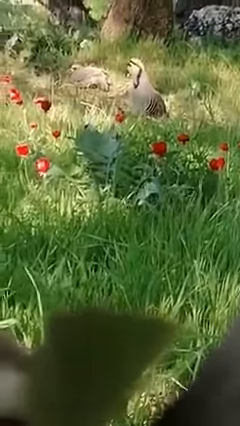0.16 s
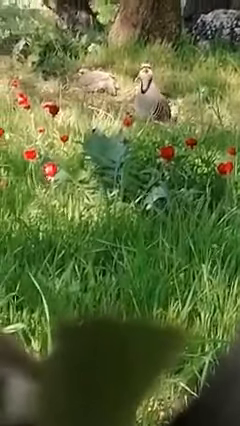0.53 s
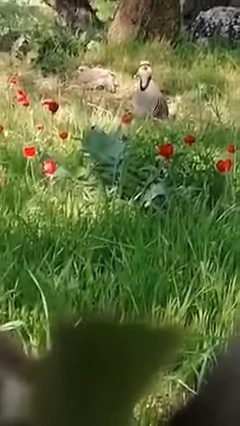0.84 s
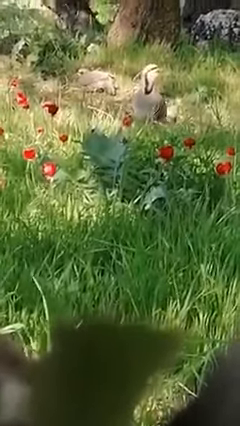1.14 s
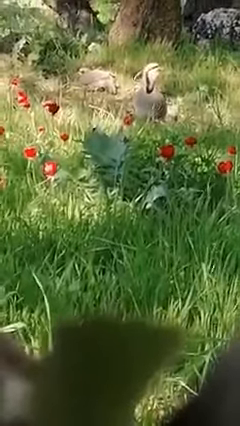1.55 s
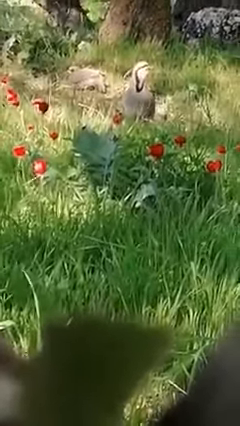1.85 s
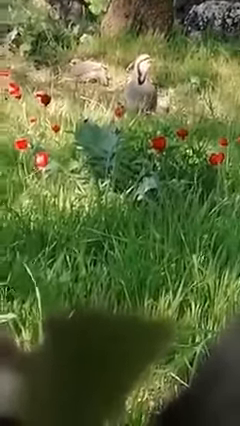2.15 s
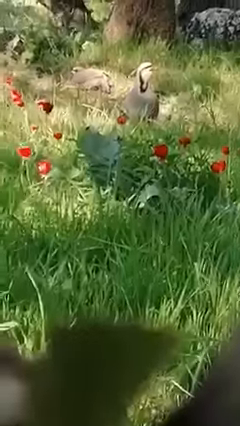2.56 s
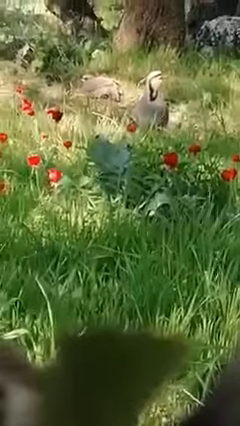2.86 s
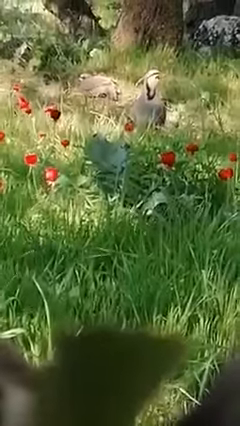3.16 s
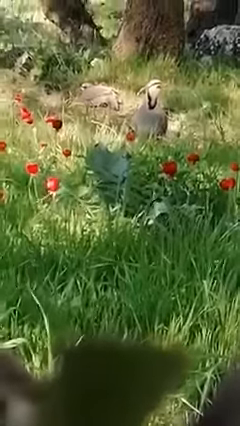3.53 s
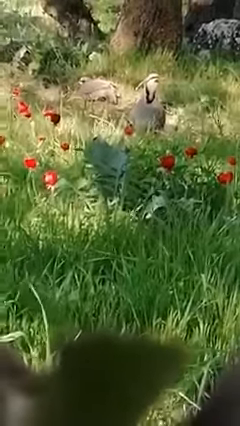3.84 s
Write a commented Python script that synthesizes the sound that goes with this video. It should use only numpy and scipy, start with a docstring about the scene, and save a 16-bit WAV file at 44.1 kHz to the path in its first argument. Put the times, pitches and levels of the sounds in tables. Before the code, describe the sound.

Harsh rhythmic partridge clucking, each bark followed by a round cluck, a softer cluck and a slightly drawn note; short outdoor echo, thin high insect buzzing, low air noise and one small nearby swish midway.

```python
"""Partridge calling in a grassy garden

A partridge calls in four-note phrases: a harsh open-beaked bark, a round cluck, a soft cluck and a drawn note.
Each note mixes a pitched tone with single snaps of the syrinx that ring the throat; grass, trunks and rocks
scatter it. Far insects trill as pulsed bands of noise over quiet air made of coloured noise.
Something rustles once beside the right microphone, as grainy noise."""
import sys
import numpy as np
from scipy import signal
from scipy.fft import rfft, irfft, next_fast_len
from scipy.io import wavfile
from scipy.ndimage import map_coordinates

SR = 44100
rng = np.random.default_rng(int(sys.argv[2]) if len(sys.argv) > 2 else 0)


def output_pcm(signal):
    """Save a mono or channel-first signal as 16-bit PCM at the path in sys.argv[1].

    Samples are clipped to [-1, 1] before scaling.
    """
    pcm = np.clip(np.atleast_2d(signal).T, -1, 1) * 32767
    wavfile.write(sys.argv[1], SR, np.round(pcm).astype(np.int16))


N = 176400  # samples


def amp(db):
    """Decibels to gain."""
    return 10 ** (np.asarray(db) / 20)


def unit(x):
    """Scale to rms 1."""
    return x / np.sqrt(np.mean(x ** 2) + 1e-20)


def along(points, hz):
    """Read a curve of (Hz, value) points on a log frequency axis."""
    f, v = np.transpose(points)
    return np.interp(np.log(hz + 1), np.log(f + 1), v)


def wobble(rate, size=N):
    """A smooth random curve through a given rate of knots a second."""
    knots = rng.standard_normal(size // 20 + 8)
    return map_coordinates(knots, [2 + np.arange(size) * rate / SR], mode='mirror')


def filtered(x, response):
    """Multiply the spectrum of x by a response of frequency."""
    m = next_fast_len(N + SR // 2)
    hz = np.fft.rfftfreq(m, 1 / SR)
    return irfft(rfft(x, m) * response(hz), m)[..., :N]


def noise(spectrum, alike=((1000, 1),)):
    """Stereo noise of rms 1; the balance of mid and side sets how alike left and right are."""
    def mid_side_gains(hz):
        turn = np.arccos(np.clip(along(alike, hz), -1, 1)) / 2
        return amp(along(spectrum, hz)) * [np.cos(turn), np.sin(turn)]

    mid, side = filtered(rng.standard_normal((2, N)), mid_side_gains)
    return unit(np.array([mid + side, mid - side]))


def ramp(x):
    """A smooth step from 0 to 1."""
    return np.sin(np.pi / 2 * np.clip(x, 0, 1)) ** 2


def swell(t, length, attack, release):
    """Attack, hold and release."""
    return ramp(t / attack) * ramp((length - t) / release)


# The four notes of the phrase. Each row: start in seconds, length in seconds, mid-note pitch in Hz,
# level in dB before the throat colours it, extra rasp in dB, share of the note at which the beak starts to open.
BARK_NOTES = [(-.028, 0.061, 394.7, -42, -1, -0.36), (.183, 0.062, 403.6, -43.5, -1, -0.29),
              (.749, 0.06, 413.6, -43, 2.5, -0.44), (1.251, .06, 404.3, -46, -4, -0.41),
              (1.804, 0.059, 397.8, -48.5, -7.5, -0.39), (2.311, 0.061, 404.2, -44.5, -3, -0.44),
              (2.856, 0.057, 433.6, -48.5, 0.5, -0.27), (3.400, .064, 405.3, -44, 2.5, -0.45),
              (3.916, .062, 413, -44, 1.5, -0.38)]
CLUCK_NOTES = [(.335, 0.05, 413, -36, -0.84, 0.53), (.888, 0.043, 402.5, -35.5, 2.7, 0.51),
               (1.400, 0.043, 393.4, -39.5, -1.2, 0.2), (1.942, .046, 408.5, -37.5, -0.32, 0.61),
               (2.464, .046, 410.6, -37, -0.4, 0.31), (3.010, 0.048, 414.6, -36.5, 0.017, 0.57),
               (3.545, 0.049, 403.3, -36, 3.6, 0.4)]
SOFT_CLUCK_NOTES = [(.460, .034, 382, -43.5, 0.028, 0.83), (1.003, 0.032, 396, -45, 0.0044, 0.67),
                    (1.515, 0.037, 360.5, -48, 0.0084, .7), (2.053, 0.04, 374, -46.5, 0, 1),
                    (2.583, .033, 391, -43, 0.02, 0.5), (3.125, 0.04, 386.5, -44, 0.0029, 0.99),
                    (3.657, 0.047, 370.5, -42.5, 0.01, 0.91)]
DRAWN_NOTES = [(.516, 0.081, 385.7, -41, 0.0083, 0.18), (1.057, 0.076, 394, -40.5, 0.034, 0.34),
               (1.566, 0.097, 389.2, -46, 0.0058, 0.22), (2.104, 0.081, 395.7, -43.5, 0.016, 0.32),
               (2.638, .078, 400, -41, 0, 0.13), (3.181, 0.072, 392.6, -41.5, 0.0099, 0.28),
               (3.700, 0.082, 392.6, -43, 0.0095, 0.13)]


def partridge():
    """The four kinds of note of the phrase; the bark never quite locks and stays ragged."""
    barks = notes(BARK_NOTES, lead=0.12, attack=0.24, release=0.6, rise=0.33, fall=0.61, lock=0.5, sag=0.24,
                  opens_over=0.99, open_hz=1300, rough=0.29, edge_db=12.5, rasp_db=7.5)
    clucks = notes(CLUCK_NOTES, lead=0.1, attack=0.23, release=0.3, rise=0.23, fall=0.23, lock=0.93, sag=0.2,
                   opens_over=1.0, open_hz=1090, rough=0.94, edge_db=2, rasp_db=-1.5)
    soft_clucks = notes(SOFT_CLUCK_NOTES, lead=0.047, attack=0.32, release=0.37, rise=0.14, fall=0.16, lock=0.7,
                        sag=0.25, opens_over=0.73, open_hz=950, rough=0.99, edge_db=-1, rasp_db=-6)
    drawn = notes(DRAWN_NOTES, lead=0.065, attack=0.49, release=0.42, rise=0.28, fall=0.23, lock=0.39, sag=0.14,
                  opens_over=0.74, open_hz=1116, rough=0.076, edge_db=2.5, rasp_db=-2)
    return barks + clucks + soft_clucks + drawn


# Throat colour with the beak shut and with it open. Each row: frequency in Hz, gain in dB.
THROAT_SHUT = [(300, -17), (400, -13), (800, -1), (1200, -22.5), (1600, -43), (2050, -26), (2450, -37)]
THROAT_OPEN = [(300, -3), (400, -7.5), (800, 1), (1150, 2.5), (1300, 12), (1650, -33.5), (2050, -29),
               (2450, -30)]
FLUTTER_RATE = 170.7  # knots a second in the roughness and the pitch unsteadiness
JITTER = 0.016  # pitch unsteadiness, as a share of pitch
SCOOP, SCOOP_OVER = 0.06, 0.357  # share of pitch by which a note starts flat, share of the note spent rising
LOW_PARTIAL_SHAKE = 0.05  # roughness of the two lowest partials


def notes(rows, lead, attack, release, rise, fall, lock, sag, opens_over, open_hz, rough, edge_db, rasp_db,
          count=6):
    """Loose snaps lock into a tone on an arched pitch, then break up; the shaping times are shares of the note."""
    out, clock = np.zeros(N), np.arange(N) / SR
    for start, length, pitch_hz, db, harsh_db, opens_at in rows:
        first = max(int(start * SR), 0)
        part = slice(first, first + SR // 8)
        u = (clock[part] - start) / length  # 0 to 1 through the note
        flutter = lambda: wobble(FLUTTER_RATE, size=len(u))
        beak = ramp((u - opens_at) / opens_over)  # 0 shut, 1 open
        flat = SCOOP * (1 - ramp(u / SCOOP_OVER))
        hz = pitch_hz * (1 - sag * (u - 0.5) - flat + JITTER * flutter())
        phase = 2 * np.pi * np.cumsum(hz) / SR
        steady = swell(u - lead, 1 - lead, attack, release)
        tone = 0
        for k in range(1, count + 1):
            partial_hz = k * abs(hz)
            throat_db = (1 - beak) * along(THROAT_SHUT, partial_hz) + beak * along(THROAT_OPEN, partial_hz)
            shake = LOW_PARTIAL_SHAKE if k <= 2 else rough
            roughness = 1 + shake * (flutter() + 1j * flutter())
            partial = np.exp(1j * (k * phase + 2 * np.pi * rng.random())) * roughness
            body = swell(u, 1, 0.45, 0.25) if k == 1 else 1  # the fundamental swells more slowly
            tone = tone + body * amp(throat_db) * partial.real / np.sqrt(0.5 + shake ** 2)
        effort = swell(u, 0.98, rise, fall)
        rattle = snaps(phase, min(lock, 1) * steady, effort, beak, open_hz, edge_db, rasp_db + harsh_db)
        out[part] += amp(db) * (steady * tone + rattle)
    return out


# Upper resonances of the throat. Each row: frequency in Hz, level in dB with the beak shut and level in dB
# with it open (both before the rasp is added), time in seconds for the ring to peak.
UPPER_RESONANCES = [(1590, -29.5, -9, 0.00033), (2093, -21.5, -26.5, 0.0017), (2434, -22.5, -24, 0.0012),
                    (3506, -22.5, -21, 0.0014), (3843, -18.5, -9.5, 0.00086), (4053, -26, -15.5, .0012),
                    (4820, -40.5, -24.5, 0.00074), (7116, -44.5, -38, 0.0009), (8600, -46, -45.5, .0002),
                    (11300, -57.5, -42.5, .0002)]
RING_SHUT_HZ, RING_PEAK_S = 820, 0.0013  # main resonance, which climbs as the beak opens
STEADY_SLIP_S, LOOSE_SLIP_S = 0.00005, 0.00036  # random timing slip always present, and added when fully loose
SNAP_SCATTER_DB = 2  # spread of snap levels
SNAP_SKIP = 0.3  # chance that a fully loose snap drops out, never two in a row


def snaps(phase, steady, effort, beak, open_hz, edge_db, rasp_db):
    """One syrinx snap a cycle rings the throat; where the voice is unsteady, snaps slip and drop out."""
    t = np.arange(len(phase)) / SR
    cycles = np.flatnonzero(np.diff(phase // (2 * np.pi)) > 0)
    out, last_missed = np.zeros(len(t)), False
    for i, (slip, size), luck in zip(cycles, rng.standard_normal((64, 2)), rng.random(64)):
        loose = 1 - steady[i]
        last_missed = not last_missed and luck < SNAP_SKIP * loose
        if last_missed or effort[i] == 0:
            continue
        slip_s = slip * (STEADY_SLIP_S + LOOSE_SLIP_S * loose)
        age = np.maximum(t - t[i] - slip_s, 0)
        heard = (age > 0) & (age < 0.015)
        age = age[heard]
        ring = lambda hz, s: age / s * np.exp(1 - age / s) * np.sin(2 * np.pi * hz * age)
        main_hz = RING_SHUT_HZ + beak[i] * (open_hz - RING_SHUT_HZ)
        main = amp(edge_db) * loose * ring(main_hz, RING_PEAK_S)
        upper = sum(amp(rasp_db + shut_db + beak[i] * (open_db - shut_db)) * ring(hz, s)
                    for hz, shut_db, open_db, s in UPPER_RESONANCES)
        out[heard] += effort[i] * amp(SNAP_SCATTER_DB * size) * (main + upper)
    return out


# How much the grass scatters. Each row: frequency in Hz, share of the amplitude scattered.
GRASS_SCATTER = [(400, 0.015), (900, 0.06), (1300, 0.87), (2000, 1), (4000, 0.92), (10000, 1)]
# How long the tail lasts. Each row: frequency in Hz, time in seconds to fall by 60 dB.
TAIL_T60 = [(400, 0.24), (1200, 0.23), (4000, 0.19), (10000, 0.47)]
# How loud the tail is. Each row: frequency in Hz, gain in dB.
TAIL_GAIN = [(400, -22), (800, -20), (1200, -13), (2000, -8), (4000, -3), (9000, -6)]
# Balance of the ears. Each row: frequency in Hz, left over right in dB.
EAR_BALANCE = [(400, 3), (750, 0.5), (1200, -0.5), (2300, -5), (3700, 4), (8000, -3.5)]
EAR_LAG_S = 0.00006  # the direct sound reaches the left this much later than the right
ECHO_S, ECHO_DB, ECHO_LOW_HZ = 0.028, -13, 900  # the nearest trunk; lower sound bends round it


def garden(x):
    """Grass scatters the treble differently to each ear; a trunk echoes, trunks and rocks add a short tail."""
    t = np.arange(SR // 3) / SR

    def spread(ir):
        ir = ir / np.linalg.norm(ir, axis=1, keepdims=True)
        return signal.fftconvolve(x[None], ir, axes=1)[:, :N]

    share = lambda hz: np.clip(along(GRASS_SCATTER, hz), 0, 1)
    lag = lambda hz: np.exp(1j * np.pi * hz * EAR_LAG_S * np.array([[-1], [1]]))
    direct = filtered(x, lambda hz: np.sqrt(1 - share(hz) ** 2) * lag(hz))
    grass_ir = rng.standard_normal((2, len(t))) * amp(-60 * t / 0.023)  # 60 dB down in 23 ms
    grass = filtered(spread(grass_ir), share)

    # The tail is noise that decays at its own pace in each band.
    hz, s, z = signal.stft(rng.standard_normal((2, len(t))), SR, nperseg=256)
    decay = amp(-60 * s / along(TAIL_T60, hz)[:, None]) * ramp(s / 0.0045)
    tail_ir = signal.istft(z * decay, SR, nperseg=256)[1]
    tail = filtered(spread(tail_ir), lambda hz: amp(along(TAIL_GAIN, hz)))

    near = direct + grass
    bounce = lambda hz: hz / (hz + ECHO_LOW_HZ) * np.exp(-2j * np.pi * hz * ECHO_S)
    echo = amp(ECHO_DB) * filtered(near, bounce)
    balance = lambda hz: amp(along(EAR_BALANCE, hz) * np.array([[0.5], [-0.5]]))
    return filtered(near + echo + tail, balance)


# Grainy swish. Each row: time in seconds, level in dB before flicker and panning.
BRUSH_LEVEL = [(1.65, -94), (1.682, -61.5), (1.71, -66.5), (1.755, -54), (1.785, -56.5), (1.821, -69),
               (1.87, -68.5), (1.93, -66.5), (1.97, -88.5)]
# Its colour. Each row: frequency in Hz, relative density in dB per Hz.
BRUSH_SPECTRUM = [(500, -36), (1200, -2.5), (1900, 3.5), (3200, 0), (4200, -8), (6000, -2.5), (8000, -10.5),
                  (11000, -23.5), (14500, -20)]


def brush():
    """A swish close to the right microphone: coloured noise whose level flickers fast enough to sound grainy."""
    level_db = np.interp(np.arange(N) / SR, *np.transpose(BRUSH_LEVEL), left=-150, right=-150)
    grain_db = 1.9 * wobble(330)
    pan = amp([[-12], [2.5]])  # left and right, dB
    return amp(level_db + grain_db) * noise(BRUSH_SPECTRUM, [(1000, 0.27)]) * pan


# High buzzes of the first insect. Each row: start in seconds, length in seconds, level in dB before panning.
HIGH_BUZZES = [(0.245, 0.31, -68), (0.828, .33, -67), (1.451, 0.31, -67), (2.003, 0.32, -67),
               (2.582, .35, -68), (3.169, 0.36, -67)]
# Replies of the second insect. Each row: start in seconds, length in seconds, level in dB.
REPLIES = [(0.708, 0.64, -71), (2.18, 0.71, -72.5), (3.42, 0.44, -77)]
TRILL_RISE_S, TRILL_FALL_S, TRILL_CLIMB_HZ = 0.1, 0.046, 260  # the climb is reached at full effort


def insects():
    """One insect swells from a low buzz to a higher, louder one; a second answers lower down."""
    t = np.arange(N) / SR
    high = sum(amp(db) * swell(t - start, length, TRILL_RISE_S, TRILL_FALL_S)
               for start, length, db in HIGH_BUZZES)
    effort = high / high.max()
    high_buzz = high * trill(centre_hz=4960, width_hz=330, depth=0.36, climb=TRILL_CLIMB_HZ * effort)
    low_buzz = amp(-78.5) * (1 - effort) * trill(centre_hz=5050, width_hz=530, depth=0.47)
    replies = sum(amp(db) * swell(t - start, length, 0.16, 0.15) for start, length, db in REPLIES)
    second = replies * trill(centre_hz=4670, width_hz=240, depth=0.19)
    pan = amp([[-1], [1.2]])  # left and right, dB
    return (high_buzz + low_buzz) * pan + second


TRILL_RATE_HZ = 59  # mean pulse rate


def trill(centre_hz, width_hz, depth, climb=0):
    """A band of noise, pulsed at a wavering trill rate and shifted up by climb (Hz)."""
    band = filtered(rng.standard_normal((2, N)), lambda hz: 1 / (1 + ((hz - centre_hz) / width_hz) ** 4))
    shift = np.exp(2j * np.pi * np.cumsum(climb * np.ones(N)) / SR)
    band = (signal.hilbert(band) * shift).real
    rate_hz = TRILL_RATE_HZ * (1 + 0.029 * wobble(5.3))
    beat = np.cos(2 * np.pi * np.cumsum(rate_hz) / SR)
    return unit(band * (1 + depth * beat))


# Colour of the air. Each row: frequency in Hz, relative density in dB per Hz.
AIR_SPECTRUM = [(25, 1), (60, -7), (150, -10), (250, -15), (600, -15), (1200, -20.5), (1800, -24),
                (3000, -26), (4500, -28.5), (6000, -33.5), (7200, -32.5), (8200, -41.5), (12500, -46.5),
                (14500, -47)]
# Width of the air. Each row: frequency in Hz, left-right likeness from 0 to 1.
AIR_LIKENESS = [(30, 0.31), (150, 0.12), (600, 0.5), (2000, 0.18), (10000, 0)]
AIR_DB = -65  # mean level


def air():
    """Quiet outdoor air: noise heavy in the lows, with a restless level."""
    return amp(AIR_DB + 1.3 * wobble(6.6)) * noise(AIR_SPECTRUM, AIR_LIKENESS)


def scene():
    """The bird in its garden, the swish, the insects and the air."""
    return garden(partridge()) + brush() + insects() + air()


TOP_HZ = 14700  # band limit


def record(dry):
    """The recorder keeps nothing above its band limit."""
    return filtered(dry, lambda hz: hz < TOP_HZ)


dry = scene()
out = record(dry)
output_pcm(out)
```